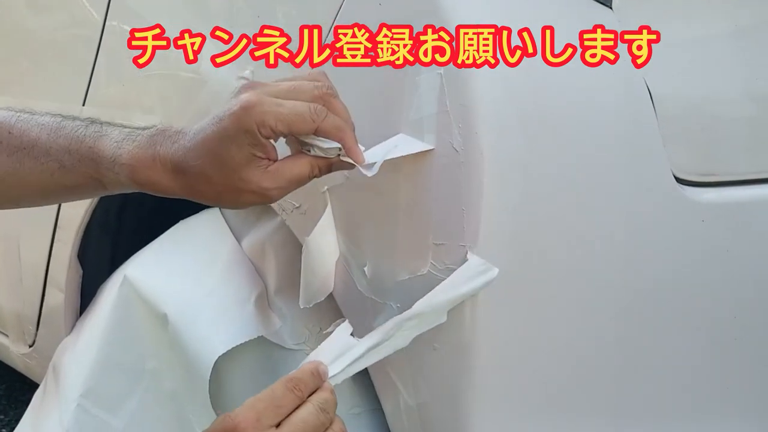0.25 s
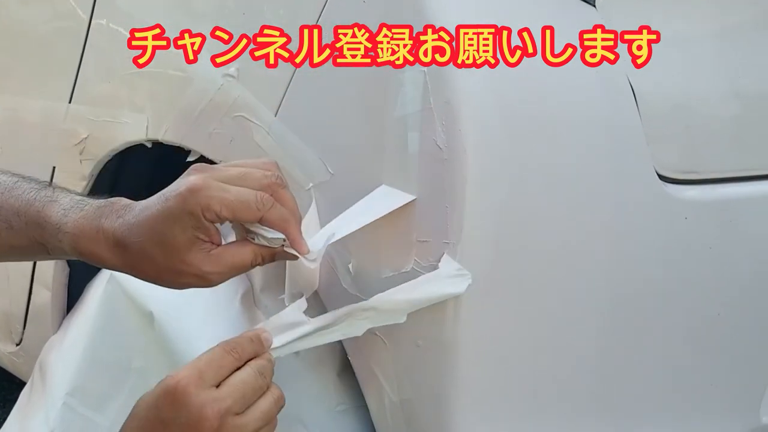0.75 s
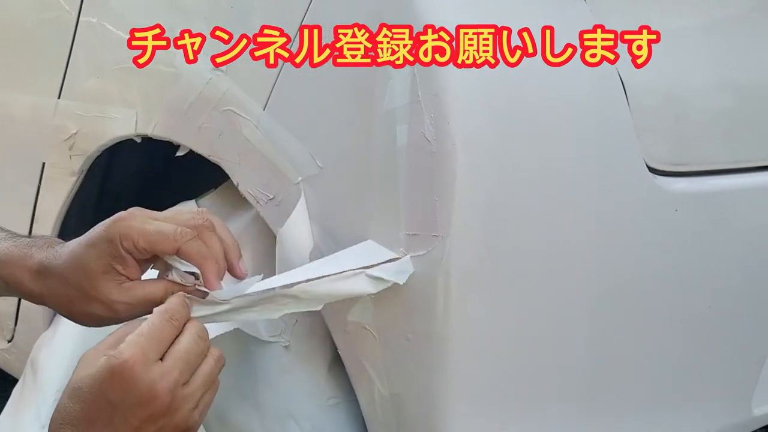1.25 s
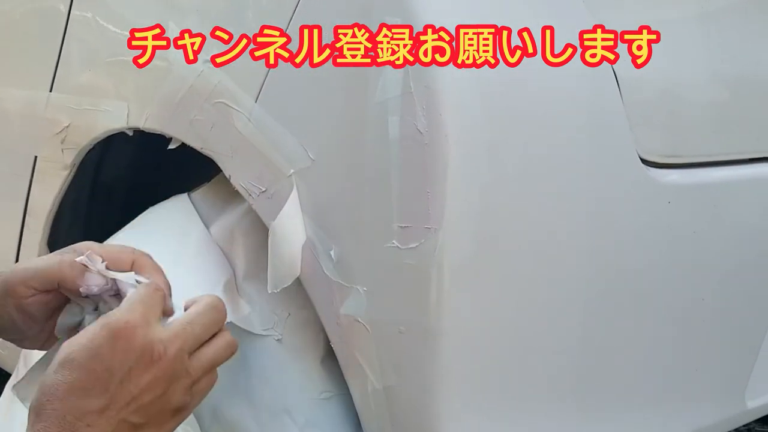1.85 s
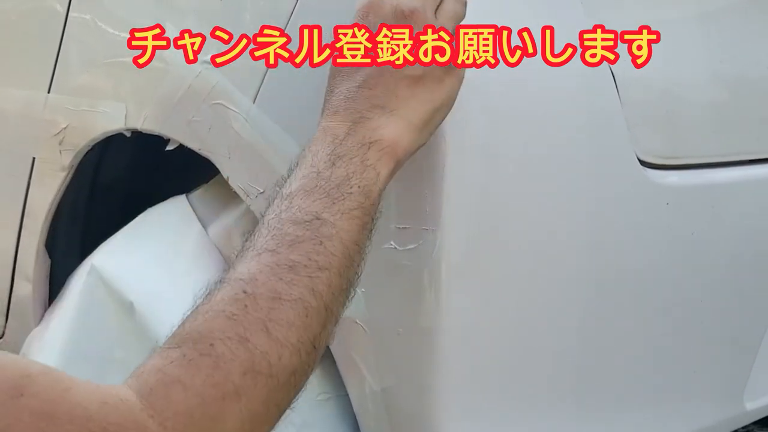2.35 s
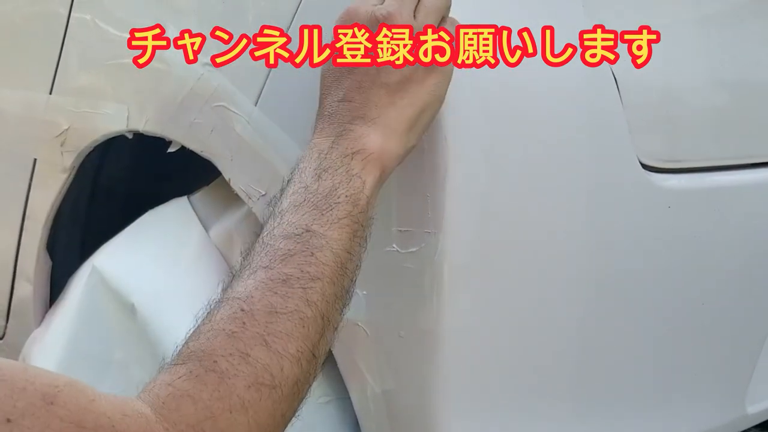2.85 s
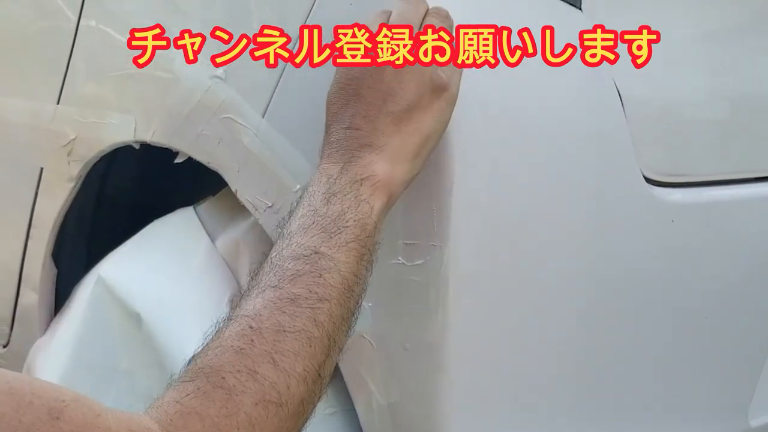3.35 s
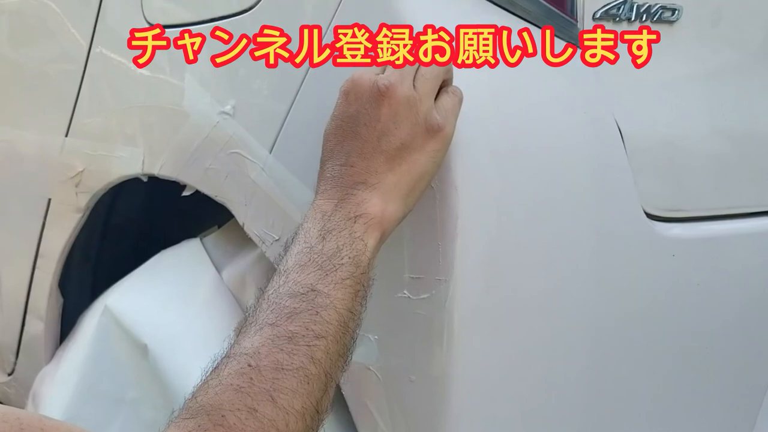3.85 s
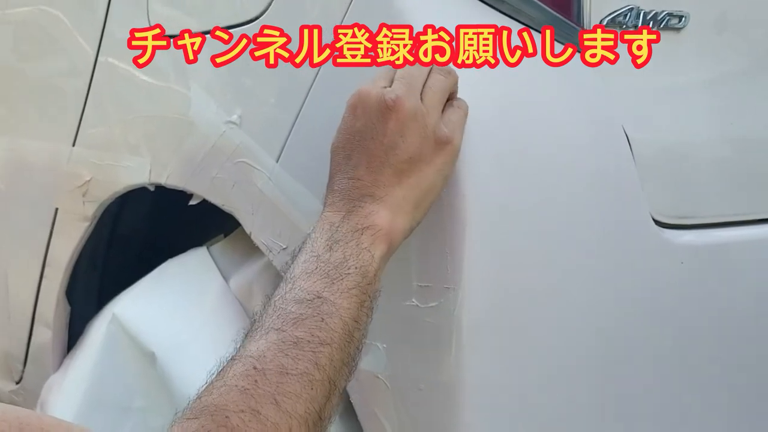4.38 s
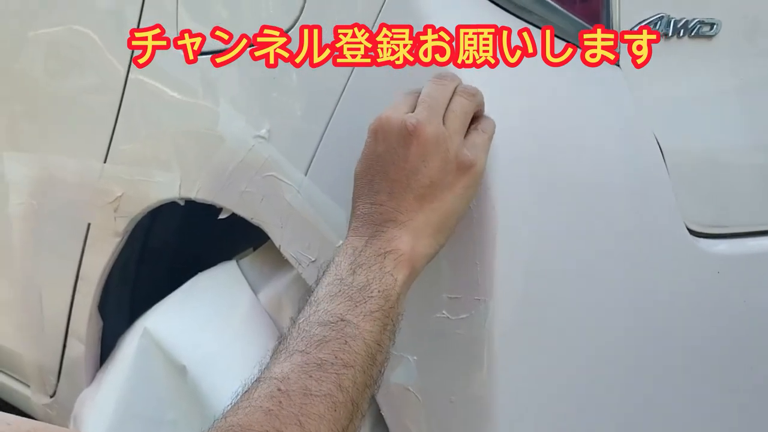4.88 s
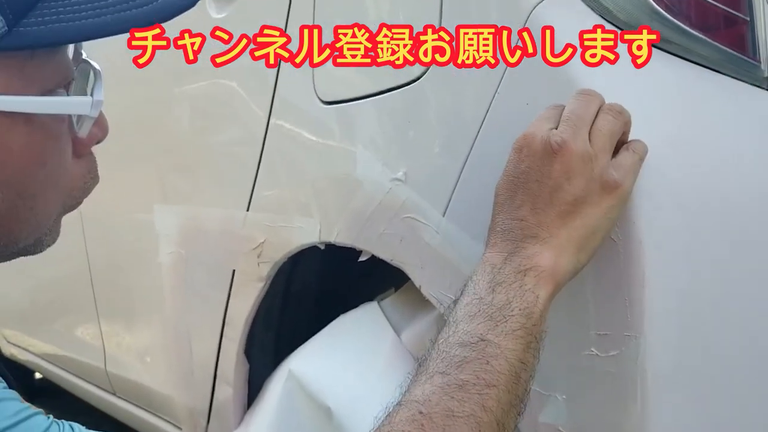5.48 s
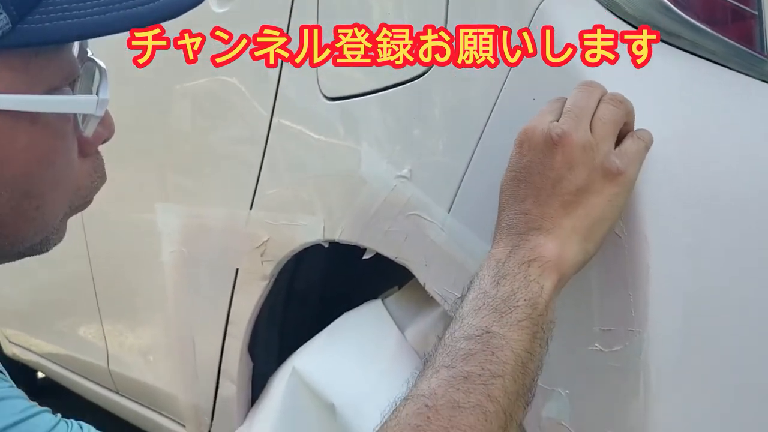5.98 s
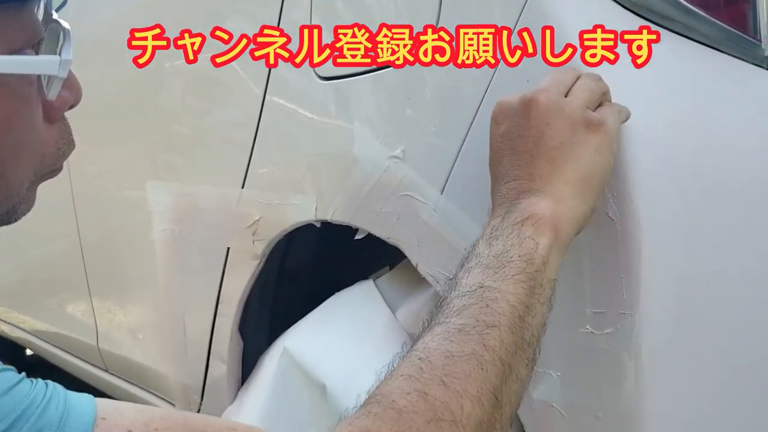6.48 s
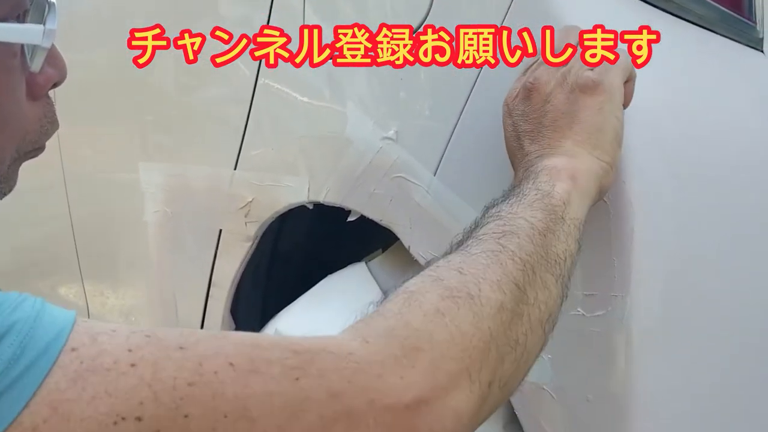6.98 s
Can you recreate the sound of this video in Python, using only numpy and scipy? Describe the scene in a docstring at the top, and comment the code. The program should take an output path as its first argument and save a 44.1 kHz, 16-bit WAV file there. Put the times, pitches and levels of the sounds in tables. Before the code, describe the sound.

Outdoors and close by, tape is peeled from drumming sheet metal and crumpled, followed by sparse finger thuds and small scrapes over constant hiss.

```python
"""Masking tape peeled close by off a car's side panel: glue slips rasp in the tape and drum on the sheet metal.
The strip is then crumpled in the hands: crackling fibre noise under short cracks and pops of single creases.
Fingers pick at the next edge, and slide over and bump the panel, which rings in decaying modes.
Outdoors, with a far filtered-noise rumble and wavering hum tones. A small camera's two microphones add
a bright, steady hiss; the top is cut steeply."""
import sys
import numpy as np
from scipy import signal
from scipy.fft import rfft, irfft, next_fast_len
from scipy.io import wavfile

SR = 44100
rng = np.random.default_rng(int(sys.argv[2]) if len(sys.argv) > 2 else 0)


def master_out(mix):
    """Clip the mix to full scale and print it as 16-bit PCM to the path in sys.argv[1]."""
    frames = np.transpose(np.atleast_2d(mix))
    ceiling = np.clip(frames, -1, 1)
    pcm = np.round(ceiling * 32767).astype(np.int16)
    wavfile.write(sys.argv[1], SR, pcm)


N = 318843


def from_db(db):
    """Decibels to amplitude gain."""
    return 10 ** (np.asarray(db) / 20)


def rms_one(x):
    """Scale to an rms of 1."""
    return x / np.sqrt(np.mean(x ** 2) + 1e-20)


def at_hz(points, hz):
    """Read a (frequency, dB) curve along a logarithmic frequency axis."""
    points = np.array(points)
    return np.interp(np.log(hz + 1), np.log(points[:, 0]), points[:, 1])


def colour(x, spectrum):
    """Causal (minimum-phase) filter with the given spectrum and steep skirts; white noise keeps its power."""
    size = next_fast_len(x.shape[-1] // 2 + 2048) * 2
    hz = np.arange(size // 2 + 1) * SR / size + 1
    octaves_outside = np.abs(np.log2(hz / np.clip(hz, spectrum[0][0], spectrum[-1][0])))
    skirt_db = np.minimum(30 * octaves_outside, 70)
    gain = rms_one(from_db(at_hz(spectrum, hz) - skirt_db))
    # folding the cepstrum onto positive times gives the minimum phase
    cepstrum = irfft(np.log(gain))
    cepstrum[1:size // 2] *= 2
    cepstrum[size // 2 + 1:] = 0
    response = np.exp(rfft(cepstrum))
    return irfft(rfft(x, size) * response)[..., :x.shape[-1]]


def drift(rate):
    """Slow random wander of rms 1; a higher rate wanders faster."""
    step = 40   # samples between the computed points
    r = np.exp(-2 * step * np.pi * rate / SR)
    noise = rng.standard_normal(N // step + 2002)
    slow = signal.lfilter([1], [1, -2 * r, r * r], noise)[2000:]   # drop the settling time
    return np.interp(np.arange(N) / step, np.arange(len(slow)), rms_one(slow))


def ring(clicks, hz, t60):
    """Resonator: a unit click sets a sine of height 1 ringing, 60 dB down after t60 seconds."""
    r = np.exp(-np.log(1000) / (t60 * SR))
    w = 2 * np.pi * hz / SR
    return signal.lfilter([0, np.sin(w)], [1, -2 * r * np.cos(w), r * r], clicks + 1e-18)


def pair(alike, size=N):
    """White noise at the two microphones, partly shared (alike = correlation)."""
    mid, side = rng.standard_normal((2, size))
    alike = np.clip(alike, 0, 1)
    return np.sqrt((1 + alike) / 2) * mid + np.sqrt((1 - alike) / 2) * side * np.array([[1], [-1]])


def pan(x, left_db):
    """Make the left microphone louder than the right by left_db."""
    return x * from_db(np.array([[left_db], [-left_db]]) / 2)


def right_leads(x, lag_s):
    """The sound reaches the left microphone a little later."""
    n = np.arange(N)
    return np.array([np.interp(n - lag_s * SR, n, x[0]), x[1]])


def add(track, s, sound):
    """Mix a short sound into the track at s seconds."""
    start = max(int(s * SR), 0)
    track[..., start:start + sound.shape[-1]] += sound[..., :max(N - start, 0)]


def stroke(s, half_s):
    """Smooth Gaussian swell round a moment."""
    return np.exp(-((np.arange(N) / SR - s) / half_s) ** 2 / 2)


def held(start_s, end_s, attack_s, release_s):
    """Gain that rises to 1 at the start, holds to the end and dies away."""
    t = np.arange(N) / SR
    return np.exp(-np.maximum(start_s - t, 0) / attack_s - np.maximum(t - end_s, 0) / release_s) + 1e-12


def slips(per_s, spread_db, fade_s):
    """Envelope of tiny random releases of uneven size, each dying quickly; rms 1."""
    sizes = from_db(spread_db * np.minimum(rng.exponential(1, N), 4))
    energy = (rng.random(N) < per_s / SR) * sizes ** 2
    decay = np.exp(-2 / (fade_s * SR))
    return rms_one(np.sqrt(signal.lfilter([1], [1, -decay], energy + 1e-18)))


# self-noise of the left and right microphone, and a duller floor in both:
# (frequency [Hz], relative density [dB per Hz])
LEFT_HISS_SPECTRUM = [(3550, -31), (3850, -29), (4300, -13), (4950, -2.5), (5400, 2), (6300, 1), (7300, -3),
                      (8200, -13), (9000, -27.5), (9800, -20.5), (11200, -11), (13000, -8.5), (15000, -0.5),
                      (15700, -8.5)]
RIGHT_HISS_SPECTRUM = [(3550, -33), (3850, -11.5), (4300, -10), (4900, -2), (5650, 2), (6400, -1),
                       (7050, -5), (8100, -7), (9100, -12), (9800, -12.5), (11200, -10), (12400, -3.5),
                       (13600, -6), (15000, 1.5), (15700, -9.5)]
DULL_HISS_SPECTRUM = [(300, -10), (700, -2), (1000, -3.5), (1220, -3.5), (1500, -6.5), (2200, -5.5),
                      (2550, 2.5), (2820, 4.5), (3050, -6), (3500, -3.5), (4200, 2.5)]


def hiss():
    """Each microphone has its own hiss, shaped by the resonances of its port."""
    left_db = -37.0 + 0.3 * drift(26)
    right_db = -42.5 + 1.1 * drift(15)
    left = from_db(left_db) * colour(rng.standard_normal(N), LEFT_HISS_SPECTRUM)
    right = from_db(right_db) * colour(rng.standard_normal(N), RIGHT_HISS_SPECTRUM)
    dull = from_db(-60) * pan(colour(pair(alike=0.017), DULL_HISS_SPECTRUM), left_db=3.5)
    return np.array([left, right]) + dull


RUMBLE_DB, RUMBLE_WANDER_DB, RUMBLE_WANDER_RATE = -54, 1, 5.4
# a far machine hum fades in, is full at this time and stays
HUM_FULL_S, HUM_ATTACK_S, HUM_DB = 5.47, 0.69, -52
# distant rumble: (frequency [Hz], relative density [dB per Hz])
RUMBLE_SPECTRUM = [(15, -30), (25, -27), (53, 1.5), (86, 2), (157, -12.5), (179, -20.5), (197, -12.5),
                   (214, -13), (239, -27), (279, -15.5), (448, -32), (700, -43), (910, -61), (1540, -120)]
# swells of the rumble: (time [s], level [dB], half length [s])
RUMBLE_SWELLS = [(0.7, -62, 0.39), (5.043, -45.5, .07), (5.801, -59.5, 0.52)]


def outdoors():
    """Far off: noise rumble that swells and sinks, a wavering hum, a faint higher tone and a steady drone."""
    air = pan(pair(alike=.58), left_db=-2.0)
    swells = sum(from_db(db) * stroke(s, half_s) for s, db, half_s in RUMBLE_SWELLS)
    steady = from_db(RUMBLE_DB + RUMBLE_WANDER_DB * drift(RUMBLE_WANDER_RATE))
    rumble = (steady + swells) * colour(air, RUMBLE_SPECTRUM)
    fade_in = np.exp(np.minimum(np.arange(N) / SR - HUM_FULL_S, 0) / HUM_ATTACK_S)
    hum_hz = 96 + 2 * drift(3.4)
    hum = from_db(HUM_DB) * fade_in * np.sin(2 * np.pi * np.cumsum(hum_hz) / SR)
    whine_hz = 214 + 2 * drift(4.35)
    whine = from_db(-61.5) * np.sin(2 * np.pi * np.cumsum(whine_hz) / SR)
    # the upper part of the distant noise holds steady
    drone_spectrum = [(90, -0.5), (150, 0), (240, -6.0), (300, -7), (500, -21.5)]
    drone = from_db(-62.0) * colour(pair(alike=0.85), drone_spectrum)
    return right_leads(rumble + hum + whine + pan(drone, left_db=10.0), lag_s=0.00012)


def touch(hz, hard_db):
    """A harder touch excites more of the high frequencies (dB)."""
    return at_hz([(400, 0), (1300, 1.02 * (hard_db + 12.5))], hz)


PANEL_LAG_S = .00011   # the panel's sound reaches the left microphone this much later
# modes of the freely ringing panel: (frequency [Hz], relative level [dB], time to fall 60 dB [s])
PANEL_MODES = [(158.4, 1, 0.21), (207.3, -14, 0.52), (275.5, -5.5, 0.17), (312, 1, 0.15),
               (390.6, -1.5, 0.087), (475, -5, 0.12), (549, -12, 0.11), (660, -8, 0.079), (730, -15, 0.032),
               (840, -5.5, 0.092), (1183, -4.5, 0.074), (1296, -16.5, 0.17), (1586, -9.5, 0.019),
               (1806, -11.5, 0.099), (2526, -12, 0.078)]
# fingers sliding over the panel: (time [s], relative level [dB], half length [s], relative hardness [dB])
BRUSHES = [(2.91, -57, 0.026, -27), (3.36, -55, 0.13, -47), (3.672, -47, 0.0055, -34),
           (4.657, -60.5, 0.027, -4.5), (5.102, -50.5, 0.031, -15), (5.353, -58.5, 0.038, -32),
           (5.461, -53, 0.018, -39), (6.043, -60, 0.012, -12), (6.093, -55.5, 0.055, -9.5),
           (6.558, -72, 0.11, 2), (7.072, -63.5, 0.39, -5.5)]


def brushes():
    """Sliding skin catches and slips, and keeps the panel's modes murmuring."""
    friction = pair(alike=.85) * slips(per_s=400, spread_db=2, fade_s=.003)
    times, modes = np.arange(0, N, 64), 0   # the slow swells are computed every 64 samples
    strokes = [(from_db(db) * stroke(s, half_s)[times], hard_db) for s, db, half_s, hard_db in BRUSHES]
    for hz, mode_db, t60 in PANEL_MODES:
        coarse_force = sum(swell * from_db(touch(hz, hard_db)) for swell, hard_db in strokes)
        force = np.interp(np.arange(N), times, coarse_force)
        # the resting hand damps the sheet
        murmur = rms_one(ring(friction, hz, .3 * t60))
        modes = modes + from_db(mode_db - 10) * force * murmur
    return right_leads(pan(modes, left_db=3.5), PANEL_LAG_S)


CONTACT_S = 0.016   # time scale of a fingertip's press
# dense thud between the modes: (frequency [Hz], relative density [dB per Hz])
THUD_SPECTRUM = [(70, -6), (140, -1), (230, -11), (420, -7), (650, -17.5), (1000, -22), (1800, -21),
                 (2800, -30), (4500, -21), (7000, -33)]
# fingers bumping the panel:
# (time [s], relative level [dB], relative hardness [dB], frequency that the struck spot favours [Hz])
BUMPS = [(2.667, -45, -16, 333), (2.891, -39, -36, 360), (3.043, -29, -18, 422), (3.06, -32, -18, 295),
         (3.292, -45, -43, 320), (3.477, -18.5, -12, 188), (3.679, -29.5, -20.5, 333),
         (3.893, -24.5, -14, 266), (5.893, -32, -5, 467), (5.911, -30.5, -16, 308),
         (6.048, -34.5, -15, 312), (7.216, -28.5, -16.5, 330)]


def bumps():
    """A fingertip strikes the panel's modes and the dense thud between them; each spot favours its own modes."""
    out, t = np.zeros((2, N)), np.arange(SR // 3) / SR
    press = 1 - np.exp(-t / (0.21 * CONTACT_S))
    for s, db, hard_db, spot_hz in BUMPS:
        tone = 0
        for hz, mode_db, t60 in PANEL_MODES:
            octaves_away = np.log2(hz / spot_hz)
            nearness = np.exp(-(octaves_away / .3) ** 2)
            chance_db = 0.6 * rng.standard_normal()
            strength = from_db(mode_db + touch(hz, hard_db) + 6.9 * nearness + chance_db)
            sine = np.sin(2 * np.pi * (hz * t + rng.random()))
            tone = tone + strength * sine * np.exp(-np.log(1000) * t / t60)
        skin = pair(alike=.8, size=len(t)) * press * np.exp(-t / (1.4 * CONTACT_S))
        thud = colour(skin, [(hz, band_db + touch(hz, hard_db)) for hz, band_db in THUD_SPECTRUM])
        add(out, s, from_db(db) * (from_db(-12.5) * press * tone + from_db(-10.0) * thud))
    return right_leads(pan(out, left_db=2.0), PANEL_LAG_S)


# nail on tape: (frequency [Hz], relative density [dB per Hz])
NAIL_SPECTRUM = [(1200, -9), (1750, 5), (2800, -3.5), (4200, -2.5), (7000, -8)]
# a fingernail lifting the tape edge: (time [s], level [dB], half length [s])
PICKS = [(2.756, -63, 0.022), (3.410, -56.5, 0.015), (3.766, -49, 0.018), (3.833, -39.5, 0.011)]


def picking():
    """A nail scrapes under the tape edge in tiny catches."""
    scrapes = sum(from_db(db) * stroke(s, half_s) for s, db, half_s in PICKS)
    catches = slips(per_s=1200, spread_db=2, fade_s=.0008)
    return right_leads(colour(scrapes * catches * pair(alike=0.31), NAIL_SPECTRUM), PANEL_LAG_S)


# balling up the strip: loudest at first, quieter as the ball tightens
CRUMPLE_START_S, CRUMPLE_END_S = 1.66, 2.78
CRUMPLE_ATTACK_S, CRUMPLE_RELEASE_S = 0.11, 0.16
CRUMPLE_DB, CRUMPLE_FADE_DB_PER_S = -45.5, 12.5
# small creases snap at random while the paper is balled up
SMALL_CREASE_COUNT, SMALL_CREASE_DB, SMALL_CREASE_SPREAD_DB = 14, -42.5, 2.0
SMALL_FACET_HZ, SMALL_FACET_OCTAVES, SMALL_BUCKLE_S = 2580, 0.38, 0.0015


def small_creases():
    """Rows like those of the large creases, scattered over the crumpling and fading half as fast in dB."""
    slot_s = (CRUMPLE_END_S - CRUMPLE_START_S) / SMALL_CREASE_COUNT
    rows = []
    for k, (when, size, pitch) in enumerate(rng.uniform(-1, 1, (SMALL_CREASE_COUNT, 3))):
        elapsed_s = (k + when / 2) * slot_s
        db = SMALL_CREASE_DB + SMALL_CREASE_SPREAD_DB * size - CRUMPLE_FADE_DB_PER_S * elapsed_s / 2
        hz = SMALL_FACET_HZ * 2 ** (SMALL_FACET_OCTAVES * pitch)
        rows.append((CRUMPLE_START_S + elapsed_s, db, hz, SMALL_BUCKLE_S))
    return rows


FIST_CLOSED_S, FIST_CLOSING_S = 2.07, 0.13   # the fist closes round the ball and muffles the cracks
OPEN_CRACK_DB, FIST_CRACK_DB = 3.5, -5.5   # crack against pop, before and after
# broad crack of paper: (frequency [Hz], relative density [dB per Hz])
PAPER_SPECTRUM = [(300, -22), (700, -1.5), (1300, -1), (2300, -4), (4200, 5), (6500, 7.5), (9000, -11),
                  (12000, -2.5), (16000, 6)]
# large creases snapping: (time [s], relative level [dB], facet pitch [Hz], buckling time before limits [s])
CREASES = [(0.4493, -37, 3960, 0.00083), (1.489, -35, 2110, .002), (1.603, -37.5, 3000, 0.0036),
           (1.628, -32.5, 2210, 0.00075), (1.651, -40, 1920, 0.0033), (1.756, -35, 3030, 0.0026),
           (1.763, -36, 3600, 0.0026), (1.7763, -38, 2400, .0012), (1.851, -41, 3800, 0.0022),
           (1.8815, -28, 2760, 0.0043), (1.8865, -39, 3800, 0.00091), (1.9316, -37, 3200, 0.0034),
           (1.961, -34.5, 3080, 0.0024), (1.967, -40, 2870, 0.0013), (2.0087, -26, 3300, 0.0025),
           (2.023, -28, 2790, 0.0021), (2.028, -28.5, 3300, 0.0064), (2.102, -39, 2920, .001),
           (2.147, -31.5, 2640, 0.0014), (2.172, -40.5, 2060, 0.0021), (2.206, -38.5, 3480, 0.0034),
           (2.2865, -35.5, 2670, 0.0023), (2.292, -35, 2700, 0.0034), (2.316, -33.5, 2340, 0.00097),
           (2.383, -37, 3200, 0.002), (2.3935, -34, 3180, .0014), (2.403, -33, 3480, 0.0033)]


def creases():
    """A crease buckles within milliseconds: a broad crack, a pop at its facet's pitch, a faint shiver."""
    out, t = np.zeros((2, N)), np.arange(SR // 12) / SR
    for s, db, hz, buckle_s in list(CREASES) + small_creases():
        closing_s = [FIST_CLOSED_S - FIST_CLOSING_S, FIST_CLOSED_S]
        crack_db = np.interp(s, closing_s, [OPEN_CRACK_DB, FIST_CRACK_DB])
        age = t / np.clip(buckle_s, .0005, .003)
        shiver = from_db(-19) * np.exp(-t / .016)
        fade = age * np.exp(1 - age) + shiver
        crack = colour(pair(alike=0.36, size=len(t)) * fade, PAPER_SPECTRUM)
        facet_spectrum = [(0.57 * hz, -15), (0.68 * hz, -4), (hz, 0), (1.33 * hz, -5), (2.84 * hz, -17)]
        pop = colour(pair(alike=0.36, size=len(t)) * fade, facet_spectrum)
        snap = from_db(crack_db) * pan(rms_one(crack), left_db=4.5) + pan(rms_one(pop), left_db=-4.0)
        add(out, s, from_db(db - 4.5) * snap * np.sqrt(np.mean(fade ** 2)))
    return out


# crackle of rubbing paper: (frequency [Hz], relative density [dB per Hz])
FIBRE_SPECTRUM = [(400, -12), (1200, -10), (2300, 0.5), (3200, 2), (4200, 1), (6500, -7), (9000, -11),
                  (13000, -0.5)]


def crumpling():
    """Fibres crackle as the paper is balled up: noise broken into many tiny releases."""
    elapsed_s = np.maximum(np.arange(N) / SR - CRUMPLE_START_S, 0)
    balling = held(CRUMPLE_START_S, CRUMPLE_END_S, CRUMPLE_ATTACK_S, CRUMPLE_RELEASE_S)
    rubbing = from_db(CRUMPLE_DB - CRUMPLE_FADE_DB_PER_S * elapsed_s) * balling
    fibres = slips(per_s=800, spread_db=3.0, fade_s=.001)
    return pan(rubbing * colour(fibres * pair(alike=.35), FIBRE_SPECTRUM), left_db=1.5)


PULL_ATTACK_S, PULL_RELEASE_S = 0.037, 0.057


def pull(start_s, end_s, build_db):
    """Gain of one pull: it takes hold, builds up to 1 and lets go."""
    to_go = np.interp(np.arange(N) / SR, [start_s, end_s], [1, 0])
    return held(start_s, end_s, PULL_ATTACK_S, PULL_RELEASE_S) * from_db(-build_db * to_go)


DRUM_BUILD_DB, RASP_BUILD_DB = 3, 4.5   # growth over one pull, as the tape tightens
CREEP_DRUM_DB, CREEP_RASP_DB = -54.5, -60.5   # between pulls the tape keeps creeping; on the pulls' scale
CLUMPS_PER_S, CLUMP_SHARE = 78, 0.3   # clumps of glue that tear at once; their weight against 5 of even rasp
# drumming of the panel, then rasp of the adhesive: (frequency [Hz], relative density [dB per Hz])
DRUMMING_SPECTRUM = [(76, -47.5), (130, 5), (211, -1.5), (242, -16), (295, 1.5), (360, 1.5), (413, -10),
                     (566, -12.5), (743, -6.5), (1260, -17), (1600, -23), (2080, -52), (3520, -120)]
RASP_SPECTRUM = [(900, -12), (1300, -5.5), (1800, 6), (2150, -1), (2550, 3.5), (3300, 0.5), (4500, 1),
                 (7000, 1), (10000, -7), (15000, -23)]
# pulls on the tape, with relative levels at the end of each:
# (start [s], end [s], panel drumming [dB], adhesive rasp [dB])
PULLS = [(0.0, 0.48, -48.5, -55.5), (0.611, 1.12, -45.5, -51.5), (1.261, 1.503, -45, -45)]


def peeling():
    """Glue strands let go by the thousand: each tugs the panel and ticks in the taut tape."""
    creep = held(PULLS[0][0], PULLS[-1][1], PULL_ATTACK_S, PULL_RELEASE_S)
    drum_gain, rasp_gain = from_db(CREEP_DRUM_DB) * creep, from_db(CREEP_RASP_DB) * creep
    for start_s, end_s, drum_db, rasp_db in PULLS:
        drum_gain = np.maximum(drum_gain, from_db(drum_db) * pull(start_s, end_s, DRUM_BUILD_DB))
        rasp_gain = np.maximum(rasp_gain, from_db(rasp_db) * pull(start_s, end_s, RASP_BUILD_DB))
    # the last pull frees the strip from the panel
    stuck = held(0, PULLS[-1][1], PULL_ATTACK_S, release_s=.06)
    strands = slips(per_s=2400, spread_db=2.4, fade_s=.0008) * from_db(1.3 * drift(45))
    tugs = strands * pair(alike=.88)
    drumming = colour(tugs, DRUMMING_SPECTRUM)
    ringing = rms_one(sum(from_db(db) * ring(tugs, hz, t60) for hz, db, t60 in PANEL_MODES))
    body = drum_gain * (from_db(-1.0) * drumming + from_db(-5.0) * ringing)
    clumps = rms_one(5 + CLUMP_SHARE * slips(CLUMPS_PER_S, spread_db=6.0, fade_s=0.0017))
    ticks = clumps * strands * pair(alike=0.21)
    rasp = from_db(2.0) * rasp_gain * colour(ticks, RASP_SPECTRUM)
    return right_leads(stuck * (pan(body, left_db=2.0) + rasp), PANEL_LAG_S)


def scene():
    """All sources together, from the background to the tape."""
    background = hiss() + outdoors()
    fingers = brushes() + bumps() + picking()
    return background + fingers + creases() + crumpling() + peeling()


CUTOFF_HZ = 15780


def record(dry):
    """The top is cut steeply by an elliptic low-pass."""
    low_pass = signal.ellip(12, .1, 80, CUTOFF_HZ, fs=SR, output="sos")   # .1 dB ripple, 80 dB stop band
    return signal.sosfilt(low_pass, dry)


dry = scene()
out = record(dry)
master_out(out)
```